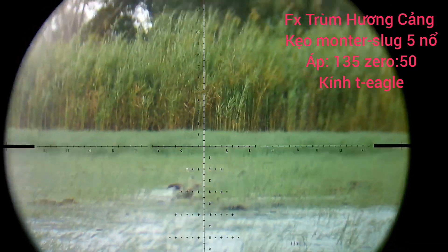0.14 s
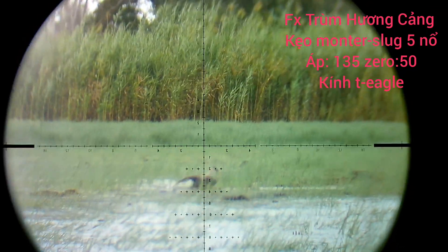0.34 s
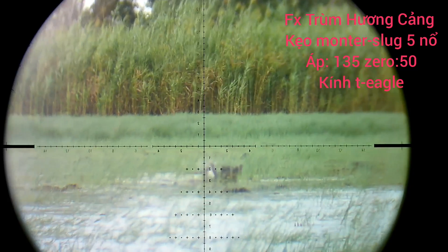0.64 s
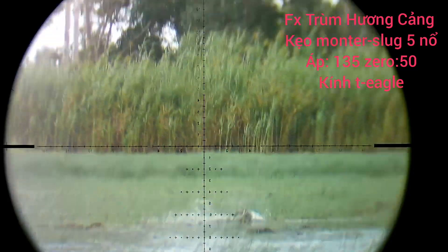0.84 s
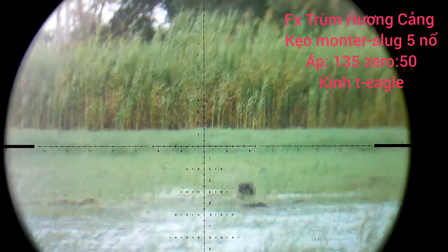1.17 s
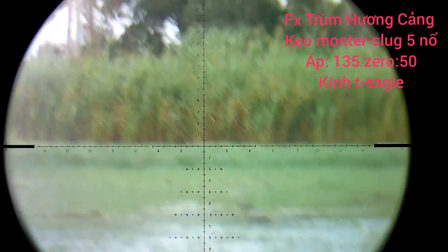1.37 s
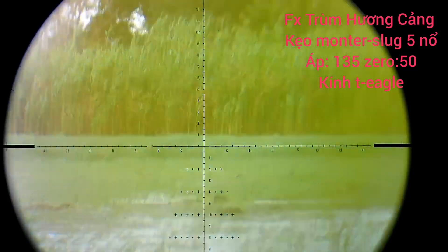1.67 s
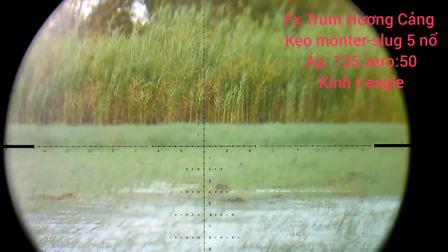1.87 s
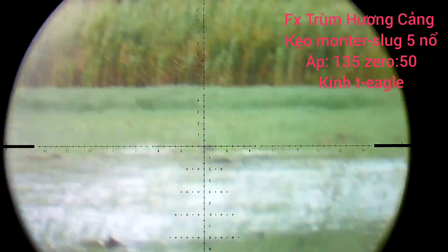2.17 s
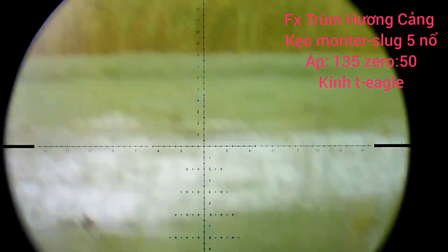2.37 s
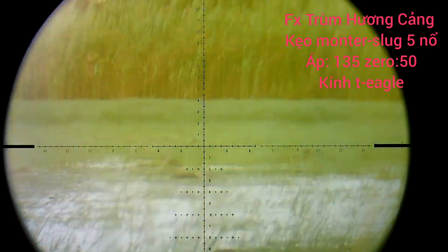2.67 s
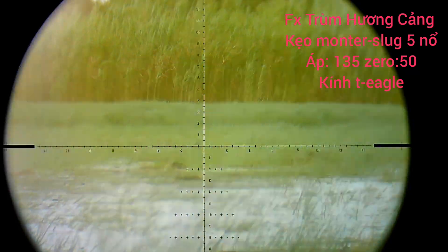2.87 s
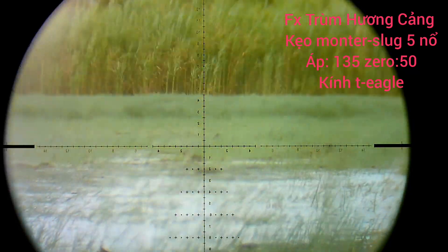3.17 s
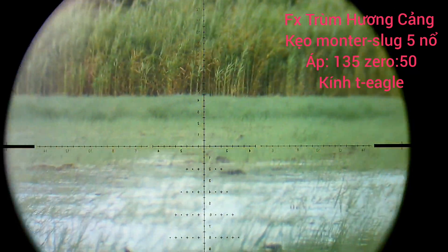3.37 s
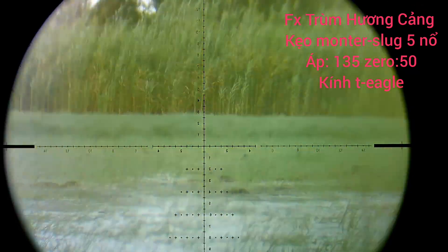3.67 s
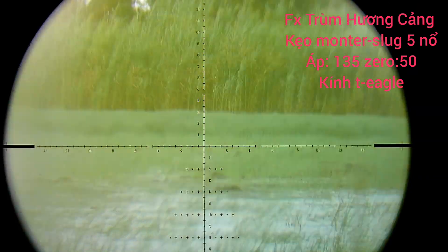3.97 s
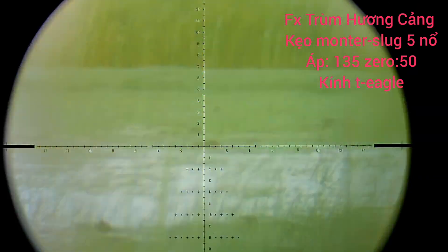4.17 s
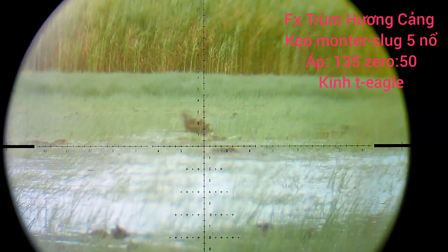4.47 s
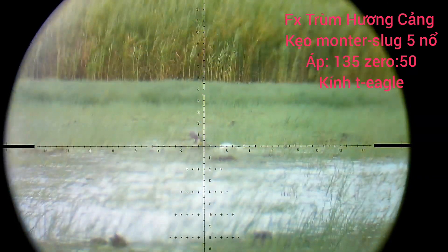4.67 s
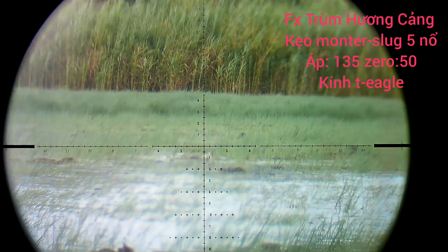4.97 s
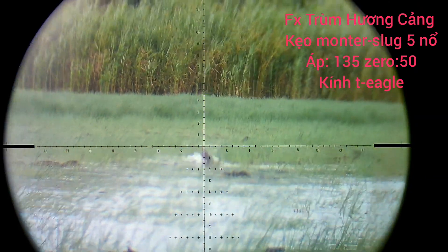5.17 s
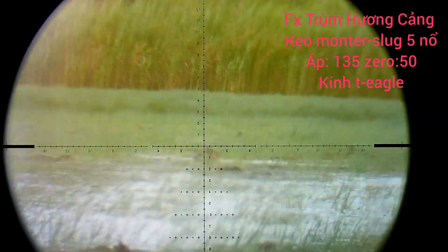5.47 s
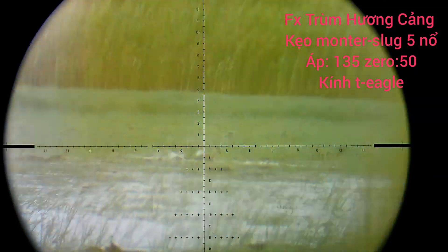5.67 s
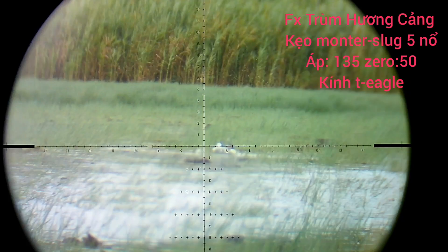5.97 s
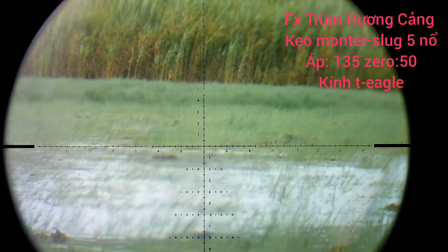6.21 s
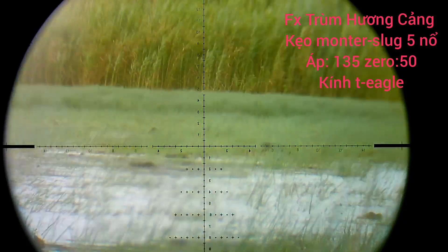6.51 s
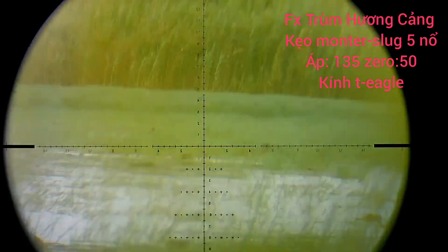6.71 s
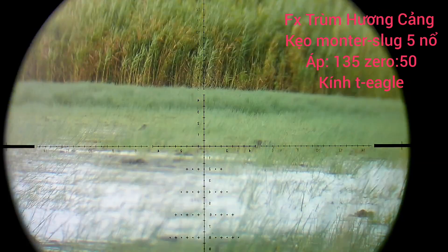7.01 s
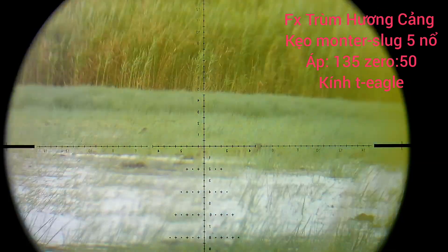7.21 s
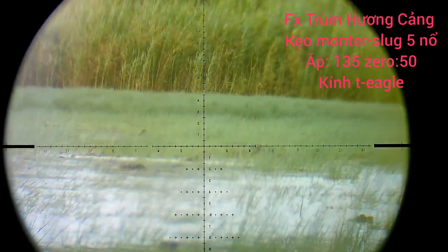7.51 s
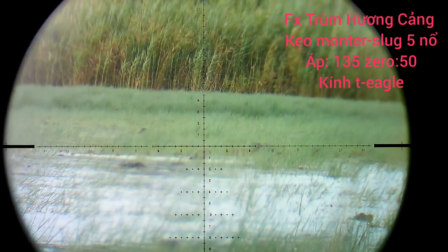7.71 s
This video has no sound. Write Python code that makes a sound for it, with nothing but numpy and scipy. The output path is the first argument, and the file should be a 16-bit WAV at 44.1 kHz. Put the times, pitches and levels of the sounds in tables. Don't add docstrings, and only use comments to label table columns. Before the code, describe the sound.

Outdoors, a small camera fixed on the gun picks up metal sliding and knocking, a short pause, then a heavier run of clunks with a light spring rattle and a hard closing snap. Soft hand bumps and a cloth brush follow. Afterwards gusts rumble and flutter at the microphone, with sparse dry scratches and grip ticks.

```python
import sys
import numpy as np
from scipy import signal
from scipy.fft import rfft, irfft, next_fast_len
from scipy.io import wavfile
from scipy.ndimage import uniform_filter1d

SR = 44100
rng = np.random.default_rng(int(sys.argv[2]) if len(sys.argv) > 2 else 0)


def boost_factor(decibels):
    exponent = np.asarray(decibels, float) / 20
    return 10 ** exponent


def transcribe(u):
    v = np.clip(np.atleast_2d(u).T, -1, 1)
    q = np.round(v * 32767).astype(np.int16)
    wavfile.write(sys.argv[1], SR, q)


N = 346185


def level(x):
    return x / np.sqrt(np.mean(x ** 2))


def shaped(x, gain):
    size = next_fast_len(N)
    hz = np.arange(size // 2 + 1) * SR / size + 1e-3
    return irfft(rfft(x, size) * gain(hz), size)[:N]


def colour(points):
    hz, db = np.transpose(points)
    return lambda f: boost_factor(np.interp(np.log(f), np.log(hz), db))


def walk(rate_hz):
    hold = int(SR / rate_hz)
    steps = np.repeat(rng.standard_normal(N // hold + 1), hold)
    return 1.3 * uniform_filter1d(uniform_filter1d(steps, hold), hold)[:N]


def ring(force, modes):
    hz, db, t60_s = np.transpose(modes)
    band = signal.butter(4, [.75 * hz.min(), 1.08 * hz.max()], "band", fs=SR, output="sos")
    force = signal.sosfilt(band, force)
    radius = np.exp(-np.log(1000) / (t60_s * SR))
    angle = 2 * np.pi * hz / SR
    gain = boost_factor(db) / np.sqrt(np.sum(boost_factor(db) ** 2))
    out = np.zeros(N if len(force) == N else len(force))
    for g, r, w in zip(gain, radius, angle):
        out += g * signal.lfilter([0, np.sin(w)], [1, -2 * r * np.cos(w), r * r], force)
    return out


def contacts(s, db, chatter_ms):
    size = 1024
    age = np.arange(size) * 1000 / SR / np.clip(chatter_ms, .05, 8)[:, None]
    fade = age ** .6 * np.exp(-1.5 * age)
    burst = rng.standard_normal(fade.shape) * fade / np.sqrt(np.sum(fade ** 2, axis=1, keepdims=True))
    start = ((s[:, None] - .001) * SR).astype(int)
    force = np.zeros(N + size)
    np.add.at(force, start + np.arange(size), burst * boost_factor(db)[:, None])
    return force[:N]


# start t/s, end t/s, housing level/dB, tube level/dB re housing, steel level/dB re housing
STROKES = [(-.05, -0.002, -41, -25, -23), (0.043, 0.096, -52, -20, -24), (0.152, 0.242, -54, -8, -13.5),
           (0.28, 0.412, -55, -20, -14), (0.24, 0.464, -58, -19, -22), (0.506, 0.69, -46, -14.5, -29),
           (0.705, 0.987, -41, -19.5, -32), (0.978, 1.135, -37.5, -24.5, -39.5),
           (1.182, 1.312, -31.5, -20, -31), (1.352, 1.387, -42, -20, -33.5),
           (1.45, 1.811, -55.5, -27, -26.5), (1.864, 2.077, -49, -27, -31),
           (2.147, 2.306, -50.5, -33.5, -34), (2.345, 2.506, -49, -37, -56), (2.518, 2.75, -58, -28, -43)]


def strokes():
    rise_s, fall_s = 0.022, 0.056
    t = np.arange(N) / SR
    start, end, db, tube, steel = np.transpose(STROKES)[:, :, None]
    shape = np.clip((t - start) / rise_s, 0, 1) * np.clip((end - t) / fall_s + 1, 0, 1)
    return [np.sum(shape * boost_factor(db + above), axis=0) for above in (0, tube, steel)]


def grains():
    grains_per_s = 9000
    rain = (rng.random(N) < grains_per_s / SR) * rng.standard_normal(N)
    rain = rain * boost_factor(1.5 * rng.exponential(size=N))
    return rain * boost_factor(3.0 * walk(60))


# t/s, housing level/dB, hardness = steel level/dB re housing, stock level/dB re housing
PULL = [(.015, -40, -34, -3.5), (.1215, -39.5, -1.5, 7), (.1385, -26.5, -11, -18), (.141, -6.5, -10, -20.5),
        (.175, -33, -8, 3.5), (.194, -28, 8, -3.5), (.227, -16.5, -26, -14.5), (.251, -32, -42, -1.5),
        (.305, -39.5, -13, -14), (.345, -45, -17, -1), (.351, -12.5, -27.5, -14), (.367, -49, 1, -12),
        (.397, -30, -23, -5), (.403, -38, -2.5, -9.5), (.441, -50, -39, -5.5), (.528, -19.5, -34, -16),
        (.533, -10.5, -32.5, -14.5), (.543, -14.5, -39, -10), (.556, -19, -26.5, -9),
        (.588, -31.5, -15.5, 7), (.602, -25, -29.5, 1), (.617, -41, -1.5, 14.5), (.655, -36, -32, -18),
        (.685, -23, -33, -19), (.691, -7, -25.5, -13), (.709, -9, -37, -4), (.7125, -1.5, -33.5, -9),
        (.788, -33.5, -21.5, -1), (.822, -29.5, -48, -26.5), (.883, -30.5, -41, -3)]
PUSH = [(.975, -36, -28, -2.5), (.99, -19.5, -32.5, 0), (.995, 2, -32.5, -6), (.999, 0.5, -13.5, -17.5),
        (1.014, 2, -23, -21.5), (1.024, -9.5, -21.5, -25), (1.077, -13.5, -41, -16),
        (1.118, -38.5, -5, -6.5), (1.131, -26, -9, 8.5), (1.142, 1.7, -24.5, -21.5),
        (1.145, -1, -24.5, -5.5), (1.151, 1.5, -19, -14.5), (1.158, -1.32, -45.5, -19.5),
        (1.173, -10, -24.5, -18.5), (1.213, -21, -29, -5.5), (1.223, -14.5, -39, -9),
        (1.226, -12.5, -30, -12.5), (1.25, -24, -13.5, -16), (1.268, -34, -12.5, -10.5),
        (1.283, -31.5, -13, -13), (1.303, -17.5, -36.5, -13.5), (1.309, -36, -4.5, 5),
        (1.329, -17.5, -38.5, -8), (1.348, -38, -24, -2.5), (1.366, -32, -41, -1), (1.39, -36, -17.5, 2.5),
        (1.428, 6, -19.5, -19.5)]
HAND = [(1.608, -34, -27, -1), (1.681, -48.5, -8.5, 11), (1.767, -44.5, -35.5, -18.5),
        (1.813, -44, -12.5, -11.5), (1.863, -56, 1, -11.5), (1.893, -39, -36, 0), (1.93, -36, -46, 8),
        (1.948, -39.5, -50.5, 15), (1.968, -46, -38, 15), (2.031, -65.5, -29, 1.5), (2.063, -46, -17, 9),
        (2.238, -42.5, -36, 4), (2.371, -22.5, -32, 1.5), (2.388, -27, -16, 6), (2.443, -39.5, -15, -2),
        (2.591, -38.5, -20, -9), (2.673, -50.5, -33.5, 9), (2.754, -44, -29.5, 4)]
# t/s, housing level/dB, stock level/dB re housing
TICKS = [(2.996, -47, 8.5), (3.416, -45.5, -16), (3.48, -42, -2), (3.544, -49.5, 9), (4.352, -54, 10),
         (4.538, -42.5, -2), (4.8, -46, -5.5), (5.474, -56, 3.5), (5.544, -37.5, 4), (5.853, -36, 11),
         (5.863, -38.5, 5), (6.214, -38, 5.5), (6.295, -50, 0), (6.369, -52.5, 1.5), (6.451, -48.5, 0),
         (6.509, -52.5, -6), (6.849, -51.5, -5.5)]


def blows():
    tube_db, tube_per_hard = (-2, -3.5, -11, -4.5), 0.6
    tick_hard_db, tick_chatter_ms = -36, 4
    chatter_ms, chatter_db_per_stock_db = 3, 0.01
    s, db, hard, stock = np.vstack([PULL, PUSH, HAND]).T
    chatter = chatter_ms * boost_factor(chatter_db_per_stock_db * np.minimum(stock, 0))
    tick_s, tick_db, tick_stock = np.transpose(TICKS)
    s, db, stock = np.r_[s, tick_s], np.r_[db, tick_db], np.r_[stock, tick_stock]
    hard = np.r_[hard, np.full(len(tick_s), tick_hard_db)]
    chatter = np.r_[chatter, np.full(len(tick_s), tick_chatter_ms)]
    tube = np.repeat(tube_db, [len(table) for table in (PULL, PUSH, HAND, TICKS)])
    return s, db, hard, stock, tube + tube_per_hard * hard, chatter


# f/Hz, level/dB, t60/s
STOCK = [(161, -15, 0.32), (280, -16.5, 0.018), (326.2, 1, 0.065), (397, 2.5, 0.019), (432.9, -5.5, 0.099)]
# f/Hz, level/dB, t60/s
HOUSING = [(590, -15.5, 0.084), (664.6, 5.5, 0.054), (734, -3, 0.035), (817, -6, 0.099),
           (906.3, -9.5, 0.11), (963, 3.5, 0.046), (1053, 5.5, 0.023), (1177, -5, 0.031),
           (1277.4, -6, 0.033), (1359, -15, 0.049), (1460, -21, 0.0083)]
# f/Hz, level/dB, t60/s
TUBE = [(1800, -8, .015), (2050, -8, .012), (2250, -7, .025), (2390, -3, .04), (2570, 0, .04),
        (2690, -4, .035), (2880, -4, .04), (2780, -13, .12), (2830, -14, .08)]
# f/Hz, level/dB, t60/s
STEEL = [(3204, -14, .03), (3360, -5, 0.012), (3820, -1.5, .015), (4180, 1, 0.0064), (4460, 1.5, 0.012),
         (4880, -9, 0.0014), (5500, -13, 0.01), (5970, -12, 0.017), (7016, -15, 0.0019)]
# f/Hz, level/dB, t60/s
SPRING = [(9300, -2.5, 0.016), (10100, 1.5, .012), (10640, -6, 0.0081), (11600, -7.5, .008)]
# f/Hz, level/dB
CRACK = [(300, -20), (900, -2.5), (2000, -1.5), (5000, -7.5), (12000, -10), (16000, -13.5)]


def rifle():
    spring_db, spring_slide_db, stock_slide_db = -18.5, -20, -8.5
    crack_db, crack_ms, crack_per_hard = -16, 1.2, .7
    pull_ring_share = 0.72
    s, db, hard, stock, tube_above, chatter_ms = blows()
    housing, tube, steel = strokes()
    rain = grains()
    released = int((PULL[-1][0] + PUSH[0][0]) / 2 * SR)
    # modes, blow dB re housing, sliding pressure
    parts = ((STOCK, stock, housing * boost_factor(stock_slide_db)),
             (HOUSING, 0, housing),
             (TUBE, tube_above, tube),
             (STEEL, hard, steel),
             (SPRING, hard + spring_db, steel * boost_factor(spring_slide_db)))
    out = np.zeros(N)
    for modes, above, slide in parts:
        force = contacts(s, db + above, chatter_ms)
        held = ring(force[:released], np.multiply(modes, [1, 1, pull_ring_share]))
        free = ring(force[released:], modes)
        out += np.r_[held, free] + slide * level(ring(rain, modes))
    crack = contacts(s, db + crack_db + crack_per_hard * hard, np.maximum(crack_ms, chatter_ms / 2))
    return out + shaped(crack, colour(CRACK))


# t/s, level/dB
WIND = [(0.0, -41.5), (.13, -44.5), (.55, -46), (1.16, -43.5), (1.5, -45.5), (2.1, -45.5), (2.7, -44),
        (3.4, -44), (4.3, -44.5), (4.55, -41.5), (4.75, -44), (5.15, -43.5), (5.6, -39.5), (5.95, -41),
        (6.3, -40), (6.7, -47), (7.0, -49.5), (7.85, -47.5)]
# f/Hz, level/dB per Hz
GUST = [(12, -30.5), (20, 0.5), (54, 1.5), (376, -7.5), (416, -10.5), (651, -13), (848, -24.5), (998, -28),
        (1350, -32), (1730, -48), (2600, -46), (3380, -71.5), (5720, -120)]


def wind():
    breeze_db = -44.5
    flutter_db, flutter_per_db = -50.5, 1.74
    whistle_db, whistle_per_db = -80.5, 1.35
    darken_per_db = 0.85
    gust_s, gust_points_db = np.transpose(WIND)
    gust_db = np.interp(np.arange(N) / SR, gust_s, gust_points_db)
    extra_db = gust_db - breeze_db
    throb, low, high = walk(40), 0, 0
    for hz in 22 * 2 ** np.arange(0, 7, .5):
        band = shaped(rng.standard_normal(N),
                      lambda f: colour(GUST)(f) * np.exp(-(np.log2(f / hz) / .35) ** 2))
        band = band * boost_factor(2.2 * min(hz / 250, 1) * throb + 1.2 * walk(12))
        band = band * boost_factor(-darken_per_db * max(np.log2(hz / 400), 0) * extra_db)
        if hz < 210:
            low = low + band
        else:
            high = high + band
    port = colour([(2000, -19.0), (2500, -2.5), (3000, -9.5), (3600, 2.0), (4300, -9.5), (5500, -14.5)])
    whistle = shaped(rng.standard_normal(N), port) * boost_factor(1.5 * throb + 3.0 * walk(32))
    rumble = boost_factor(gust_db) * level(low)
    flutter = boost_factor(flutter_db + flutter_per_db * extra_db) * level(high)
    return rumble + flutter + boost_factor(whistle_db + whistle_per_db * extra_db) * level(whistle)


# t/s, level/dB, f/Hz, hold/s
BUMPS = [
    (0.355, -17, 63.5, 0.015),
    (0.704, -44, 59.7, 0.03),
    (1.43, -27, 133, 0.039),
    (1.138, -22, 61.7, 0.034),
    (2.048, -28, 116.7, 0.027),
    (2.375, -9.5, 140.2, 0.027),
    (5.706, -32.5, 63, 0.029),
]


def bumps():
    rise_s, sag_s, sag_tau_s = 0.014, 0.015, 0.005
    out = np.zeros(N)
    for s, db, hz, hold_s in BUMPS:
        t = np.clip(np.arange(N) / SR - s, 0, 1)
        sag = sag_s * (1 - np.exp(-t / sag_tau_s))
        swell = (1 - np.exp(-t / rise_s)) * np.exp(-(t / hold_s) ** 2)
        out += boost_factor(db) * swell * np.sin(2 * np.pi * hz * (t + sag))
    return out


# t/s, level/dB
RATTLE = [(1.1722, -60), (1.2244, -64), (1.2346, -66), (1.255, -56), (1.2604, -62), (1.267, -55),
          (1.3064, -56), (1.3269, -58), (1.3468, -63)]


def rattle():
    s, db = np.transpose(RATTLE)
    return ring(contacts(s, db + 5, np.full(len(s), 1.5)), SPRING)


# f/Hz, level/dB, t60/s
BARREL = [(2786, -.5, .75), (2801, -4, .55), (2772, 5, .16)]


def barrel():
    barrel_db, held_s, damp_s = -54, 1.70, .04
    s, db = PUSH[-1][:2]
    force = np.zeros(N)
    force[int(s * SR)] = boost_factor(db + barrel_db)
    grip = np.clip((held_s - np.arange(N) / SR) / damp_s, 0, 1)
    return ring(force, BARREL) * boost_factor(4 * walk(60)) * grip


def sleeve():
    centre_s, spread_s, sleeve_db, sleeve_hz = 2.27, .17, -84.5, 6470
    swell = np.exp(-((np.arange(N) / SR - centre_s) / spread_s) ** 2) * boost_factor(2.5 * walk(30))
    cloth = shaped(rng.standard_normal(N), lambda f: np.exp(-(np.log2(f / sleeve_hz) / .15) ** 2))
    return boost_factor(sleeve_db) * swell * level(cloth)


# t/s, level/dB
PRICKS = [(2.9086, -64.5), (2.948, -62.5), (2.9806, -60), (3.2256, -63), (3.3336, -65), (3.6978, -66.5),
          (3.7961, -67), (3.9951, -63), (4.3525, -54.5), (4.7499, -57), (5.202, -58), (5.2802, -52),
          (5.587, -55), (5.658, -53.5), (5.819, -58.5), (5.8652, -60.5), (5.9018, -58), (5.9467, -67.5),
          (6.1197, -63.5), (6.1552, -61), (6.1986, -58.5), (6.4944, -58), (6.8716, -62.5), (6.9255, -61),
          (7.1732, -62), (7.5146, -62)]
# f/Hz, level/dB, t60/s
PORT = [(3610, 4, 0.036), (4080, -4, 0.023), (4300, -9, 0.0067), (5530, -1, 0.0067)]


def pricks():
    s, db = np.transpose(PRICKS)
    return ring(contacts(s, db - 1.0, np.full(len(s), 6.5)), PORT)


def scene():
    return (rifle() + wind() + bumps() + rattle() + barrel() + sleeve() + pricks())[None]


# f/Hz, level/dB per Hz
HISS = [(880, -28), (1500, -4), (2040, -5), (2440, -4), (2830, -9.5), (3730, -6), (4690, -12), (7840, -16),
        (11800, -17.5), (15100, -14.5), (16000, -19)]


def hiss():
    hiss_db = -75
    return boost_factor(hiss_db) * level(shaped(rng.standard_normal(N), colour([(700, -56.5)] + list(HISS))))


def roll_off(x):
    return signal.sosfilt(signal.butter(12, 16270, fs=SR, output="sos"), x)


def record(dry):
    notch_hz, notch_width_hz = 8000, 900
    saturated = dry[0] / (1 + np.abs(dry[0]) ** 14) ** (1 / 14)

    def response(f):
        notch = np.sqrt(0.0047 + 1 - 1 / (1 + ((f - notch_hz) / notch_width_hz) ** 2))
        return notch / np.sqrt((1 + (25 / f) ** 2) * (1 + (f / 11500) ** 4.5))

    mix = shaped(saturated, response) + hiss()
    return roll_off(mix[None])


dry = scene()
out = record(dry)
transcribe(out)
```